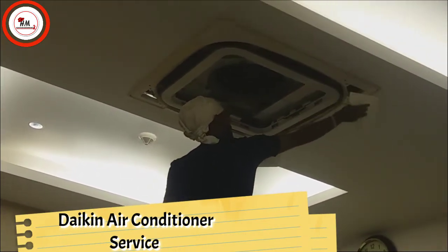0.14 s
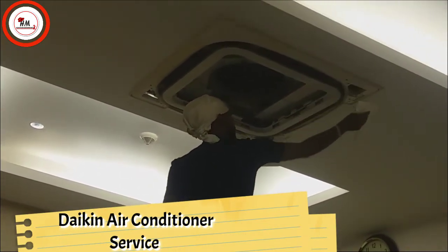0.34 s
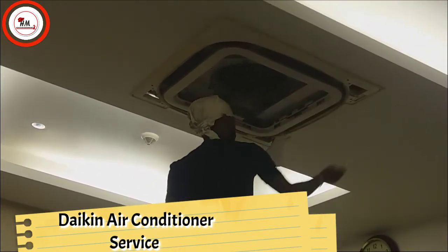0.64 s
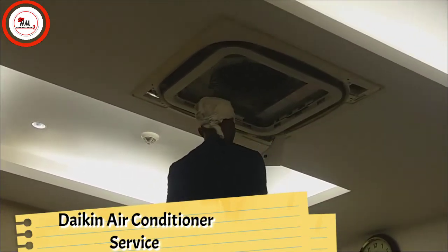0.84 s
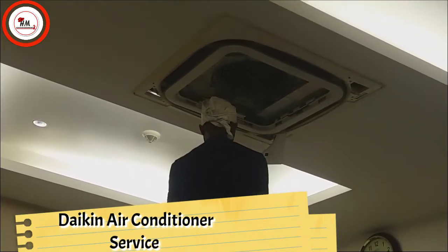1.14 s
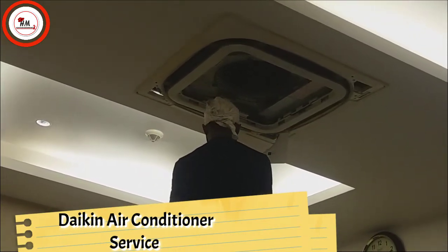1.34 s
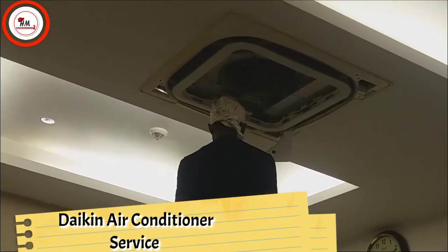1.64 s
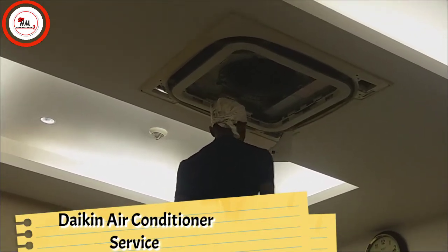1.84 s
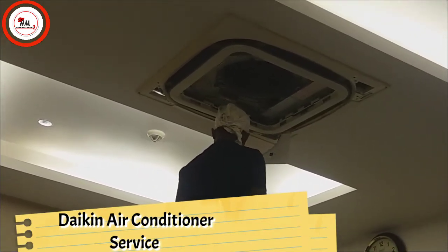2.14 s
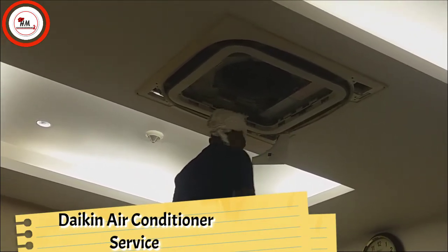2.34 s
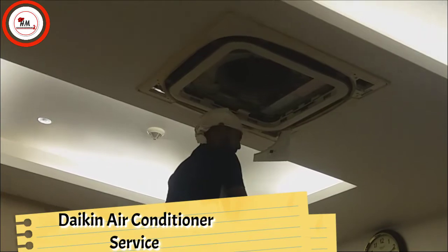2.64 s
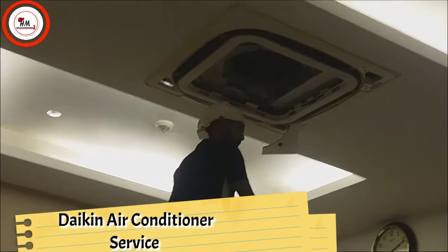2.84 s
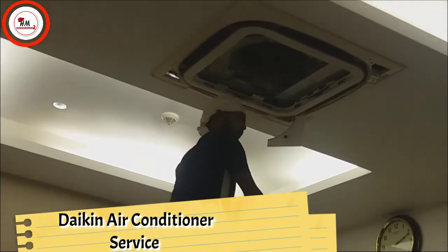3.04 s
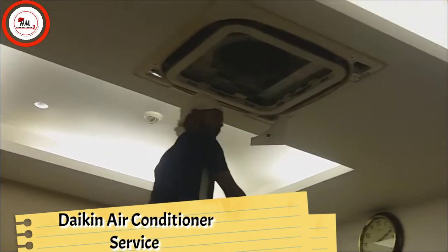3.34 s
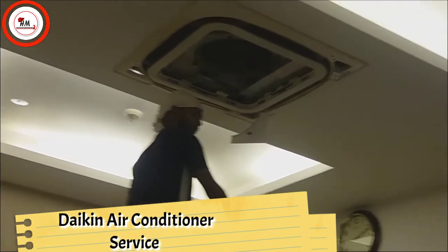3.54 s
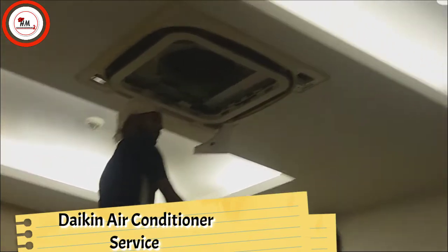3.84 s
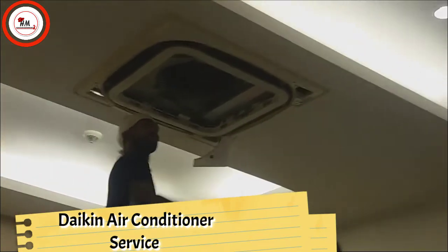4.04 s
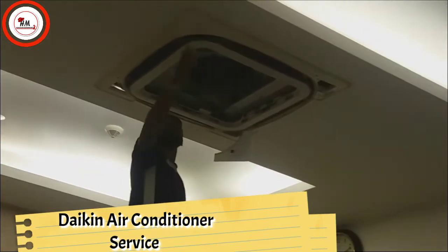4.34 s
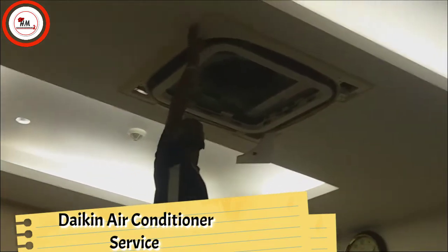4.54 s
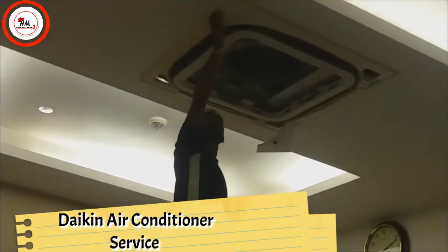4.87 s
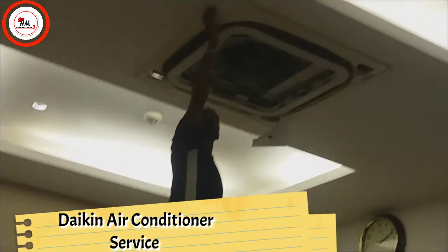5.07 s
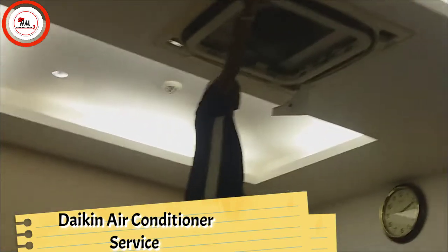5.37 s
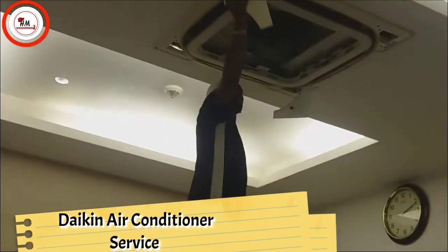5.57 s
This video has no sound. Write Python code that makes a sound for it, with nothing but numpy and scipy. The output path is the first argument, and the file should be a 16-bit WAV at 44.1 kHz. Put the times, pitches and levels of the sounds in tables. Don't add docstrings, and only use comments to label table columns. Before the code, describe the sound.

Indoors, a worker unclips plastic panels from a ceiling unit, heard by a phone a few metres away. A loud, thin snap opens and echoes for about half a second. Several quiet seconds follow with soft hand rubs, tiny squeaks, faint grille knocks and close finger ticks on the phone. Near the end, small catches slip, then two hard latch clacks ring the panel and ceiling boards, with lighter knocks between, over low ventilation hum.

```python
import sys
import numpy as np
from scipy import signal
from scipy.fft import rfft, irfft
from scipy.io import wavfile
from scipy.ndimage import uniform_filter1d

SR = 44100
rng = np.random.default_rng(int(sys.argv[2]) if len(sys.argv) > 2 else 0)


def invert_db(x):
    u = np.asarray(x, float) / 20
    return 10 ** u


def dump(signal):
    limited = np.clip(np.atleast_2d(signal).T, -1, 1)
    pcm = np.round(limited * 32767).astype(np.int16)
    wavfile.write(sys.argv[1], SR, pcm)


N = 251811


def unit(x):
    return x / np.sqrt(np.mean(x ** 2))


def band(x, lo_hz, hi_hz):
    edges_hz = [lo_hz, min(hi_hz, .45 * SR)]
    return signal.sosfilt(signal.butter(2, edges_hz, "band", fs=SR, output="sos"), x)


def walk(rate):
    hold = int(SR / rate)
    steps = np.repeat(rng.standard_normal(N // hold + 1), hold)
    return 1.3 * uniform_filter1d(uniform_filter1d(steps, hold), hold)[:N]


def add(track, s, x):
    i = int(s * SR)
    track[i:i + len(x)] += x[:N - i]


def aired(table, air_db):
    return [(*row, row[3] + air_db) for row in table]


def blows(table, body, rattle_s, fall, clicks_per_s, thin_hz, dull_hz, first, bite_s, size=4096):
    out = np.zeros(N)
    t = np.arange(size) / SR
    f = np.arange(size // 2 + 1)[:, None] * SR / size
    pool = np.array([band(rng.standard_normal(2 * SR), hz / np.sqrt(2), hz * np.sqrt(2)) for hz, _, _ in ROOM])
    hz, width, mode_db = np.transpose(body)
    modes = 1j * f * width / (hz ** 2 - f ** 2 + 1j * f * width) * (-1) ** np.arange(len(hz))
    thin = 1j * f[:, 0] / (thin_hz + 1j * f[:, 0]) / (1 + 1j * f[:, 0] / dull_hz)
    for s, peak_db, bass_db, treble_db, room_db, air_db in table:
        when, push, spot = rng.random(size), rng.standard_normal(size), rng.integers(SR)
        contacts = (when < clicks_per_s / SR) * push
        rattle = contacts * np.exp(-(t / rattle_s) ** fall) * (1 - np.exp(-t / bite_s))
        rattle[0] = first
        start = s - .0007
        colour_hz = [350, 900, 2800, 3600, 7000, 8500]
        shares_db = [bass_db, 0, 0, treble_db, treble_db, air_db]
        colour_db = np.interp(np.log(hz), np.log(colour_hz), shares_db)
        ring = 12 * invert_db(peak_db) * (modes @ invert_db(mode_db + colour_db))
        add(out, start, irfft(rfft(rattle) / np.linalg.norm(rattle) * ring * thin, size))
        add(out, start, invert_db(room_db - 24) * room(irfft(ring, size), pool, spot))
    return out


# start in seconds, peak, bass, treble and room level in dB.
LATCH_BLOWS = [
    (5.01, 1, -8, -13, -8),
    (5.2183, -11.5, -1.5, -13, -4),
    (5.2444, -23, 2, -13, -8.5),
    (5.4236, -17, -7, -12, -2.5),
    (5.5218, 1, -14, -12, -5.5),
    (5.5494, -13.5, 2, -2, -7),
]
# start in seconds, peak, bass, treble and room level in dB.
CATCH_BLOWS = [
    (4.8758, -32.5, -7, -15, -7.5),
    (4.9122, -15, -30, -9, -6.5),
    (4.9427, -23, -14, -18, -9),
]
# pitch in Hz, width in Hz, level in dB.
PANEL_MODES = [(73, 39, 11.5), (92, 49, 13), (135.5, 68, 13), (183, 45, 16), (248.8, 28, 17),
               (410, 114, 10.5), (848, 150, 4.5), (1093, 295, 2.5), (1350, 340, 4.5), (1760, 257, 4.5),
               (2006, 85, 8.5), (2204, 300, 4), (2740, 350, -13), (3070, 53, -22), (3580, 1700, 8),
               (5460, 1100, 8.5), (6360, 830, 8), (9470, 1200, 6.5), (12350, 2000, 4.5),
               (15470, 2200, -1.5)]


def panel_latches():
    latches = blows(aired(LATCH_BLOWS, air_db=-8), PANEL_MODES, rattle_s=0.0085, fall=2.0,
                    clicks_per_s=7000, thin_hz=350, dull_hz=3000, first=2.6, bite_s=.0003)
    catches = blows(aired(CATCH_BLOWS, air_db=-30), PANEL_MODES, rattle_s=0.006, fall=1.7,
                    clicks_per_s=3500, thin_hz=100, dull_hz=4100, first=1.2, bite_s=.0006)
    return latches + catches


# start in seconds, peak, bass, treble and room level in dB.
SNAP_BLOWS = [
    (0.0976, 9.5, -20.5, -1.5, -4.5),
    (0.1104, 2, -14, -10, -7.5),
    (0.1174, -2.5, -27.5, -7, 2),
]
# pitch in Hz, width in Hz, level in dB.
COVER_MODES = [(82, 27, 3.5), (153, 31, 8), (229, 180, 10), (350, 33, -11.5), (575, 110, -8),
               (940, 410, -11), (1400, 500, -9), (1900, 280, -7.5), (2270, 240, -11.5), (3200, 300, -6.5),
               (3720, 420, -5.5), (4450, 710, -5.5), (5630, 740, -8.5), (9800, 1500, -2),
               (11800, 1400, -0.5), (14500, 1400, 1.5)]


def cover_snaps():
    return blows(aired(SNAP_BLOWS, air_db=-17.5), COVER_MODES, rattle_s=0.0045, fall=3.3,
                 clicks_per_s=4700, thin_hz=1300, dull_hz=9310, first=1.5, bite_s=.0004)


# start in seconds, peak, bass, treble and room level in dB.
KNOCK_BLOWS = [
    (1.2386, -43, 7.5, -7, -6),
    (1.7754, -36, 0, -11, 0.5),
    (2.7825, -30, 2, -13, -11.5),
    (3.91, -30, -2.5, -23, -5.5),
    (3.918, -32, -20, -18, -11),
]
# start in seconds, peak, bass, treble and room level in dB.
FLICK_BLOWS = [
    (4.1632, -29.5, -15, -5.5, -5),
    (4.7225, -35.5, 0, -9, -31),
]
# pitch in Hz, width in Hz, level in dB.
GRILLE_MODES = [(150, 240, -4.5), (370, 97, 12.5), (900, 140, 0.5), (1490, 530, 5), (2050, 640, 8.5),
                (2530, 700, 8), (3850, 970, 4), (4530, 480, 8), (6600, 370, 7), (9200, 2500, -4),
                (13670, 3500, -10.5)]


def grille_knocks():
    hits = aired(KNOCK_BLOWS, air_db=-26) + aired(FLICK_BLOWS, air_db=1.5)
    return blows(hits, GRILLE_MODES, rattle_s=0.015, fall=1.0, clicks_per_s=4000,
                 thin_hz=300, dull_hz=8950, first=1.2, bite_s=.0008)


# start in seconds, pitch in Hz, level in dB, T60 in seconds.
MODE_RINGS = [(5.0105, 850, -18, 0.07), (5.045, 1960, -24, .2), (5.222, 2300, -27, .12),
              (5.25, 1297, -36, .2), (5.43, 900, -45, .2), (5.425, 2330, -33, .1), (4.8765, 2250, -42, .06),
              (4.9435, 2300, -26, .04), (5.0105, 1690, -26, .06), (5.0105, 1930, -19, 0.19),
              (5.0105, 2280, -9.5, .07), (5.522, 854, -15, 0.077), (5.523, 1670, -12.5, 0.05),
              (5.522, 2298, -12.5, 0.091), (5.523, 3090, -14, .09), (5.535, 264.4, -20.5, 0.35),
              (5.5496, 3020, -16.5, 0.11), (5.55, 2690, -20, 0.13), (5.2456, 2900, -23.5, 0.069),
              (.0976, 3100, -6, .03), (.1, 600, -20, .06), (.125, 1626, -24, .12), (.112, 3537, -18, .1),
              (.115, 5055, -20, .08), (.0976, 4580, -20, .05), (.1174, 5530, -17, 0.054),
              (.0976, 3720, -20, .06), (.0976, 2400, -14, .05), (2.288, 740, -44, 0.19),
              (2.288, 264, -39.5, .1), (2.778, 2110, -37, .08), (2.8063, 620, -39, .03),
              (2.8195, 1040, -35, 0.033), (4.9122, 2300, -18, .04), (4.9122, 1850, -37, 0.037),
              (5.0105, 4100, -25, 0.11), (5.218, 1760, -36, 0.045), (5.02, 456, -25, 0.14),
              (2.791, 3700, -40, .03), (5.4256, 2050, -36, 0.17)]


def rings():
    out, t = np.zeros(N), np.arange(SR // 3) / SR
    for s, hz, db, t60 in MODE_RINGS:
        waver = .5 * unit(band(rng.standard_normal(len(t)), 15, 90))
        fade = (1 - np.exp(-t / 0.0012)) * 1000 ** (-t / np.clip(t60, .03, .35))
        add(out, s, invert_db(db) * fade * np.sin(2 * np.pi * hz * t + waver))
    return out


# time in seconds, peak in dB, low edge in Hz, high edge in Hz, length in seconds.
EDGE_CHATTER = [(.0990, -8, 2500, 6000, .0015), (.0985, -22, 8500, 16000, .003),
                (.1115, -14, 3000, 6000, .003), (.1178, -12, 3500, 7000, .004),
                (.1178, -24, 9000, 16000, .002), (.131, -24, 12000, 16000, .002),
                (.1335, -14, 3000, 6500, .002), (.169, -20, 3000, 5500, .003),
                (2.2925, -29, 2000, 6500, .002), (2.2975, -31, 3000, 6500, .003),
                (2.3105, -35, 3500, 12500, .002), (2.315, -37, 3500, 6000, .002),
                (2.7727, -28, 3000, 6200, .001), (2.7722, -48, 11000, 16500, .002),
                (2.7832, -34, 1800, 4500, .003), (2.8185, -36, 3500, 5500, .002),
                (2.819, -49, 9000, 16000, .003), (4.1645, -42, 8500, 16500, .004),
                (4.876, -53, 11500, 16000, .004), (4.9125, -26, 3000, 7000, .002),
                (4.913, -47, 11500, 15000, .003), (4.9185, -29, 3000, 7000, .002),
                (4.9455, -33, 3500, 7000, .002), (5.0105, -20, 5500, 16000, .003),
                (5.0163, -24, 5500, 15000, .002), (5.037, -28, 12000, 16000, .003),
                (5.044, -25, 6000, 15000, .003), (5.0555, -20, 1500, 7000, .002),
                (5.2205, -29, 4000, 16000, .004), (5.247, -33, 9000, 15500, .003),
                (5.254, -26, 2000, 4500, .004), (5.2705, -42, 9000, 15500, .002),
                (5.3215, -38, 2500, 8000, .003), (5.4228, -34, 4000, 16500, .004),
                (5.5228, -20, 5500, 16500, .003), (5.549, -18, 4500, 16000, .004),
                (5.5535, -20, 5000, 16000, .003), (5.557, -19, 3500, 8500, .002),
                (5.613, -36, 8000, 16000, .002), (5.6265, -36, 6000, 16000, .002)]


def chatter():
    out, t = np.zeros(N), np.arange(1500) / SR
    for s, peak_db, lo_hz, hi_hz, length in EDGE_CHATTER:
        clicks = rng.standard_normal(len(t)) * (rng.random(len(t)) < .3)
        clicks = clicks * t / length * np.exp(-(t / length) ** 2)
        burst = band(band(clicks, lo_hz, hi_hz), lo_hz, hi_hz)
        add(out, s - length / 2, invert_db(peak_db) * burst / np.max(np.abs(burst)))
    return out


# start in seconds, peak in dB, pitch in Hz, T60 in seconds.
BOARD_BOOMS = [
    (.108, -27, 166, .75),
    (.13, -33, 340, .7),
    (.13, -35, 470, .55),
    (5.523, -24, 168, .3),
    (5.235, -33, 125, .3),
    (.105, -33, 125, 0.96),
    (5.013, -22.5, 92, 0.58),
    (5.015, -15.5, 133.3, 0.35),
    (5.222, -33, 100, 0.38),
    (5.525, -21.5, 115, 0.31),
]


def booms():
    out, t = np.zeros(N), np.arange(SR // 2) / SR
    for s, peak_db, hz, t60 in BOARD_BOOMS:
        waver = .7 * unit(band(rng.standard_normal(len(t)), 4, 25))
        fade = (1 - np.exp(-t / .015)) * 1000 ** (-t / t60)
        add(out, s, invert_db(peak_db) * fade * np.sin(2 * np.pi * hz * t + waver))
    return out


# start, rise and hold in seconds, level in dB, brightness in dB.
RUB_STROKES = [(-0.02, 0.024, 0.048, -52, -1), (1.182, 0.025, .015, -61, 5),
               (1.224, 0.022, 0.0087, -55, 5.5), (1.426, 0.015, 0.035, -66.5, 7),
               (1.687, .05, 0.022, -62, 10.5), (1.745, 0.033, .015, -46, .5),
               (1.877, 0.037, .025, -62.5, 8.5), (2.074, 0.059, 0.15, -54.5, 6),
               (2.285, 0.012, 0.069, -48.5, -8), (2.448, 0.014, 0.025, -60.5, 5.5),
               (2.692, 0.013, 0.03, -56, 3), (2.85, .012, 0.032, -59, -8), (2.96, 0.012, .005, -52, -6),
               (3.036, 0.02, 0.07, -55.5, -4), (3.136, 0.035, 0.04, -54.5, 7),
               (3.213, 0.021, 0.018, -49.5, -1), (3.495, 0.015, 0.018, -68, 2),
               (4.074, 0.028, .045, -55, -2.5), (4.182, 0.0075, 0.0089, -63, -6),
               (4.357, .025, .015, -56.5, -10), (4.597, 0.012, 0.012, -59, -11),
               (4.62, 0.0065, .006, -61, 2), (4.774, 0.04, 0.025, -62, 0), (4.845, .025, .02, -57, -12)]
# time in seconds, level in dB, brightness in dB.
FIDGET_LEVELS = [(.1, -84.5, 4), (.62, -74.5, 3), (1.14, -81, 4.5), (1.3, -64.5, 2), (1.7, -64, 2.5),
                 (2.05, -63.5, -2), (2.65, -65.5, -1.5), (2.9, -64.5, 6), (3.35, -63, -1),
                 (3.6, -68.5, -10), (3.898, -68, -7.5), (4.06, -65, -0.5), (4.4, -63.5, -1.5),
                 (4.58, -64.5, -7), (4.8, -58, -10), (4.92, -75, -2)]
# low edge in Hz, high edge in Hz, level in strokes in dB,
# level in fidgeting in dB, share of brightness, fade in dB per second.
RUB_COLOURS = [(1030, 3350, -1, -0.5, 0.048, 190), (2786, 6040, -0.5, 0, 1.05, 180),
               (8600, 12000, -14, -14.5, 0.88, 260.5), (12000, 17000, -19.5, -15, 1.4, 299.5),
               (296.8, 920, -8, 1, 0.012, 180)]


def rubbing():
    t = np.arange(0, N / SR, .002)
    start, rise, hold, stroke_db, bright_db = np.transpose(RUB_STROKES)[:, :, None]
    press = np.clip((t - start) / rise, 0, 1) ** 1.3
    after = np.maximum(t - start - rise - hold, 0)
    s, fidget_db, fidget_bright_db = np.transpose(FIDGET_LEVELS)
    grains = rng.standard_normal(N) * invert_db(2.0 * rng.exponential(size=N)) * invert_db(walk(40))
    out = np.zeros(N)
    for lo_hz, hi_hz, in_stroke_db, in_fidget_db, share, fade_db_s in RUB_COLOURS:
        steep = band(band(grains, lo_hz, hi_hz), .8 * lo_hz, 1.1 * hi_hz)
        strokes = press * invert_db(stroke_db + in_stroke_db + share * bright_db - fade_db_s * after)
        fidget = invert_db(np.interp(t, s, fidget_db + in_fidget_db + share * fidget_bright_db))
        level = np.sqrt(np.sum(strokes ** 2, axis=0) + fidget ** 2)
        out += np.interp(np.arange(N) / SR, t, level) * unit(steep)
    return out


# start in seconds, length in seconds, pitch in Hz, width in Hz, level in dB.
SKIN_SQUEAKS = [
    (1.21, 0.086, 1760, 70, -57),
    (1.233, 0.046, 5460, 500, -53.5),
    (1.462, 0.039, 5100, 300, -64),
    (1.758, 0.061, 2090, 200, -50),
    (1.764, 0.058, 5200, 500, -50),
    (1.899, 0.038, 5460, 500, -53),
    (3.049, 0.051, 1568, 30.3, -58.5),
    (3.238, 0.04, 1900, 400, -53),
    (3.157, 0.1, 3270, 1600, -48),
]


def squeaks():
    out, t = np.zeros(N), np.arange(8000) / SR
    for s, length, hz, width, db in SKIN_SQUEAKS:
        slip = rng.standard_normal(len(t))
        hiss = unit(band(slip, hz - width / 2, hz + width / 2))
        waver = .8 * unit(band(slip, 20, 90))
        whistle = np.sin(2 * np.pi * hz * t * (1.012 - .1 * t) + waver)
        tone = hiss + 10 * np.exp(-width / 30) * whistle
        add(out, s, invert_db(db) * tone * (t / length * np.e * 2 * np.exp(-2 * t / length)))
    return out


# start in seconds, peak, bass, treble and room level in dB.
CRACK_BLOWS = [
    (2.2886, -22, -28.5, 0, -11.5),
]
# start in seconds, peak, bass, treble and room level in dB.
TICK_BLOWS = [(0.0655, -50, 0, 8, -22), (1.5229, -41.5, -9, -15, -28), (2.3536, -30.5, -17, -21, -7),
              (2.7719, -29.5, -13, 0, -31), (2.778, -32, -18, 0, -13), (2.791, -29.5, -12, -19, -4),
              (2.801, -44, 4, -16, -23), (2.8044, -41, 15, -18, -6), (2.8187, -25, -10, -18, -26),
              (2.83, -35, -6, -14, -20), (2.9731, -46, -8, -8, -17), (2.999, -28.5, 5, -3.5, -34),
              (4.6039, -36, 5, -9.5, -21.5), (4.7304, -39.5, 21.5, -2.5, -6.5), (4.736, -32, -3, -29, -6.5)]
# pitch in Hz, width in Hz, level in dB.
CASE_MODES = [(300, 320, -5.5), (890, 350, 2), (2330, 550, -0.5), (3560, 600, 6.5), (4965, 2100, 1),
              (6550, 400, -5.5), (10000, 2100, -9), (13500, 3500, -3)]


def phone_ticks():
    cracks = blows(aired(CRACK_BLOWS, air_db=-14), CASE_MODES, rattle_s=0.012, fall=1.4,
                   clicks_per_s=3000, thin_hz=1200, dull_hz=12000, first=3.2, bite_s=.0003)
    ticks = blows(aired(TICK_BLOWS, air_db=-24), CASE_MODES, rattle_s=0.0013, fall=1.7,
                  clicks_per_s=860, thin_hz=150, dull_hz=7110, first=3.2, bite_s=.0002)
    return cracks + ticks


# start in seconds, peak in dB, pitch in Hz, T60 in seconds.
CASE_BUMPS = [
    (1.785, -43, 350, .08),
    (2.8068, -22.5, 175, .035),
    (2.8197, -26, 230, .02),
    (2.98, -39, 150, .04),
]


def bumps():
    out, t = np.zeros(N), np.arange(4000) / SR
    for s, peak_db, hz, t60 in CASE_BUMPS:
        swing = np.cos(2 * np.pi * hz * t * (1 - 4 * t)) * 1000 ** (-t / t60)
        add(out, s, invert_db(peak_db) * (1 - np.exp(-(t / 0.00024) ** 2)) * swing)
    return out


# band centre in Hz, T60 in seconds, build-up in seconds.
ROOM = [(61, 0.38, 0.069), (125, 1, 0.011), (250, 0.6, 0.0079), (500, 0.57, 0.011), (927, 0.47, 0.0078),
        (2160, 0.46, 0.011), (3704, 0.5, 0.0061), (8000, 0.37, 0.0044), (15000, 0.24, 0.0078)]


def room(x, pool, start):
    late = np.maximum(np.arange(36000) / SR - .003, 0)
    _, t60, build = np.transpose(ROOM)[:, :, None]
    fade = (1 - np.exp(-late / build)) * 1000 ** (-late / t60)
    return signal.fftconvolve(x, np.sum(pool[:, start:start + len(late)] * fade, axis=0))


# frequency in Hz, level in dB per Hz.
HUM_SPECTRUM = [(15, -40), (25, -21), (53, -6), (134, -10), (166, -6), (190, -10), (714, -31.5),
                (911, -30.5), (1160, -38), (1480, -36.5), (2350, -42.5), (5140, -46), (7110, -55.5),
                (12200, -50), (16000, -49)]
# time in seconds, level in dB.
RUMBLE_SWELL = [(0.55, -64), (0.64, -65.5), (1.16, -57), (1.87, -52.5), (2.02, -57.5), (2.37, -52.5),
                (2.49, -54), (3.2, -54), (3.64, -57.5), (4.23, -53), (4.63, -53.5), (4.85, -57)]


def hum():
    hum_db = -46.5
    f = np.maximum(np.arange(N // 2 + 1) * SR / N, 1)
    hz, db = np.transpose(HUM_SPECTRUM)
    shape = invert_db(np.interp(np.log(f), np.log(hz), db))
    noise = invert_db(hum_db) * unit(irfft(rfft(rng.standard_normal(N)) * shape, N))
    low = signal.sosfilt(signal.butter(1, 400, fs=SR, output="sos"), noise)
    swell_db = np.interp(np.arange(N) / SR, *np.transpose(RUMBLE_SWELL)) - hum_db
    return noise + (invert_db(swell_db + walk(12)) - 1) * low


def scene():
    unclipping = panel_latches() + cover_snaps() + grille_knocks() + rings() + chatter() + booms()
    handling = rubbing() + squeaks() + phone_ticks() + bumps()
    return (unclipping + handling + hum())[None]


def low_pass(x):
    return signal.sosfilt(signal.butter(12, 16590, fs=SR, output="sos"), x)


def record(dry):
    x = signal.sosfilt(signal.butter(3, 38, "high", fs=SR, output="sos"), dry)
    port_hz, port_width_hz, port_depth = 8050, 2200, 0.45
    x = x - port_depth * signal.lfilter(*signal.iirpeak(port_hz, port_hz / port_width_hz, fs=SR), x)
    ceiling = .86
    x = ceiling * np.tanh(x / ceiling)
    x = signal.sosfilt(signal.ellip(8, .2, 25, 15600, fs=SR, output="sos"), x)
    return low_pass(x)


dry = scene()
out = record(dry)
dump(out)
```